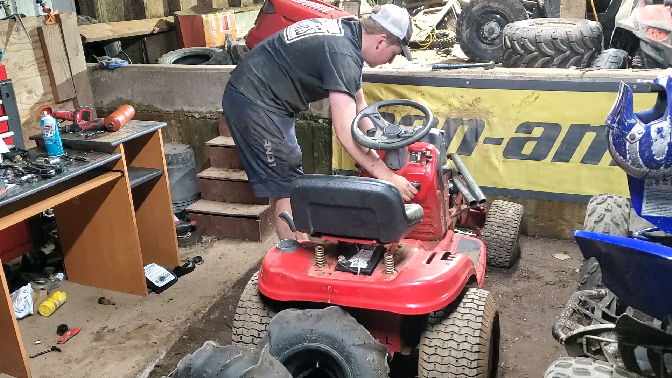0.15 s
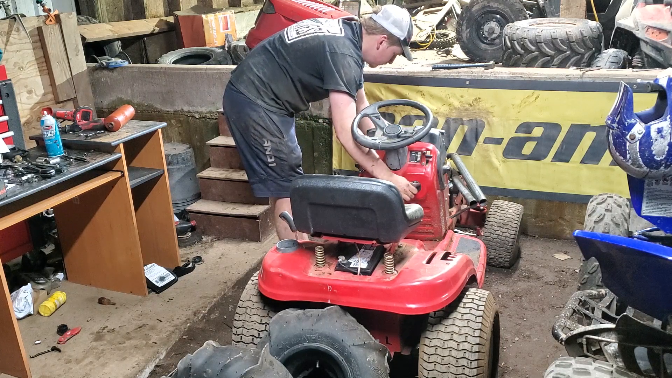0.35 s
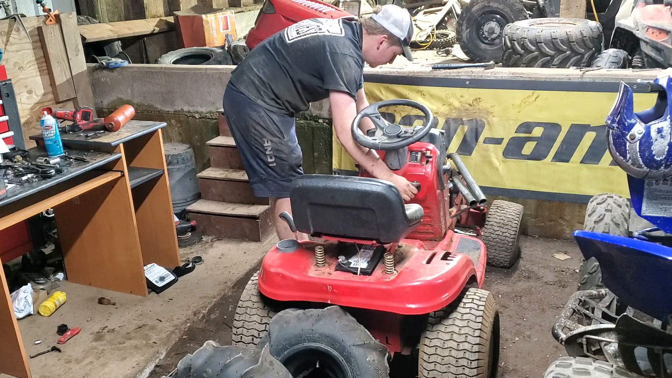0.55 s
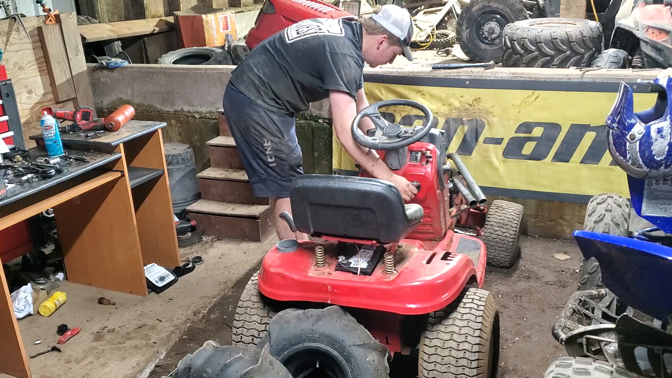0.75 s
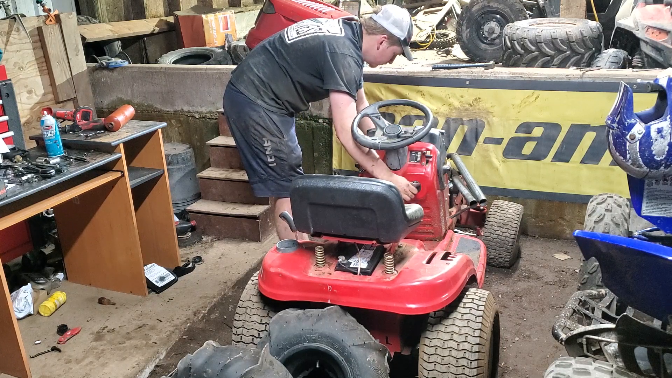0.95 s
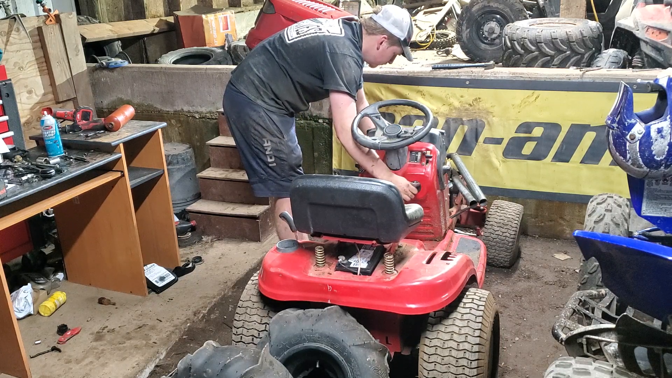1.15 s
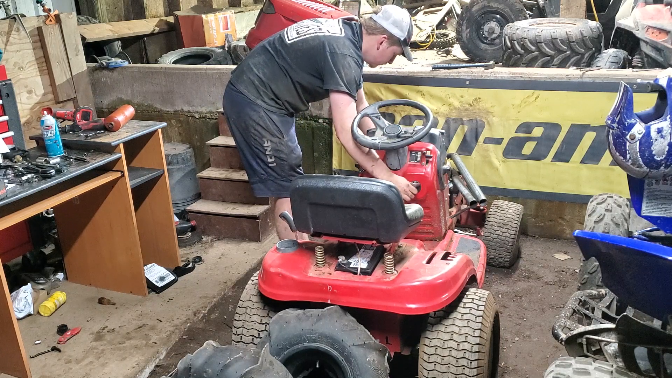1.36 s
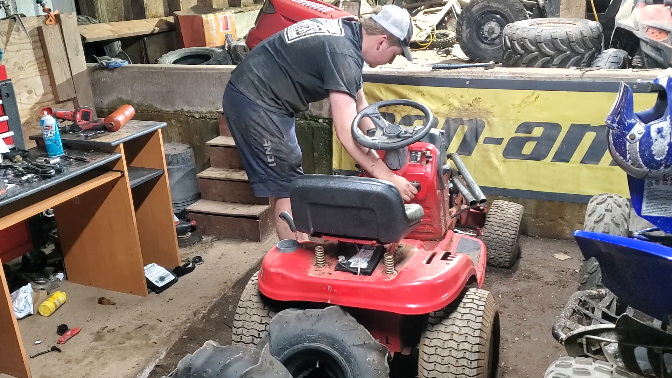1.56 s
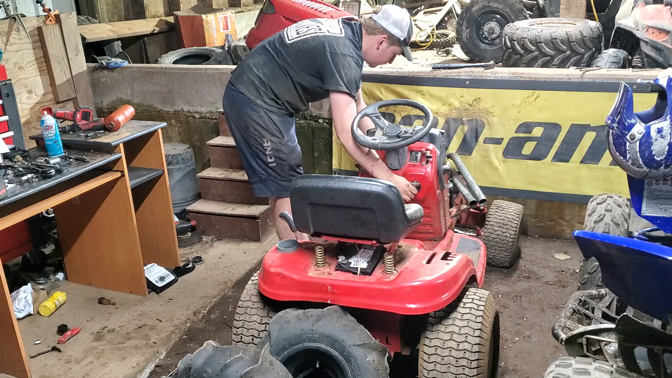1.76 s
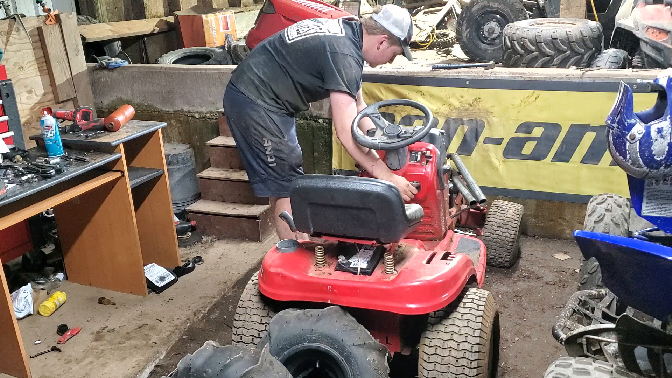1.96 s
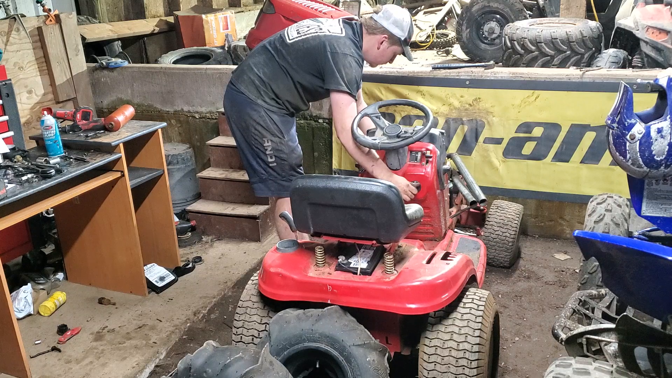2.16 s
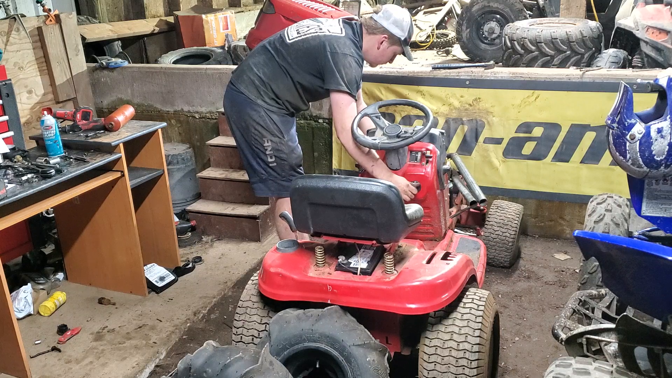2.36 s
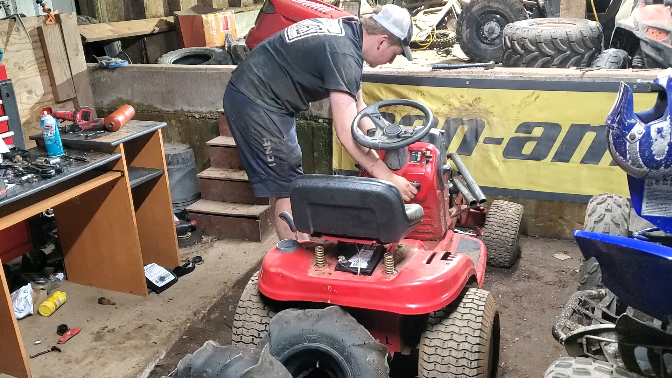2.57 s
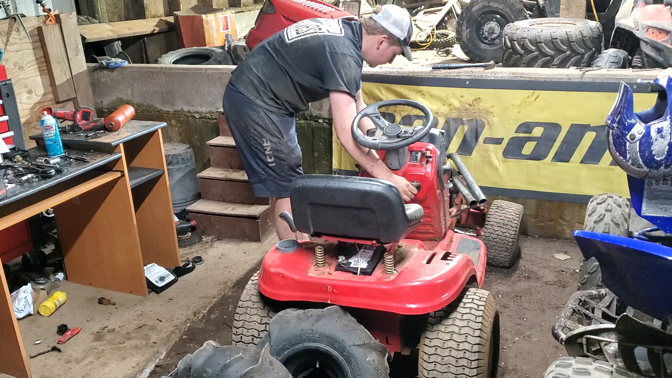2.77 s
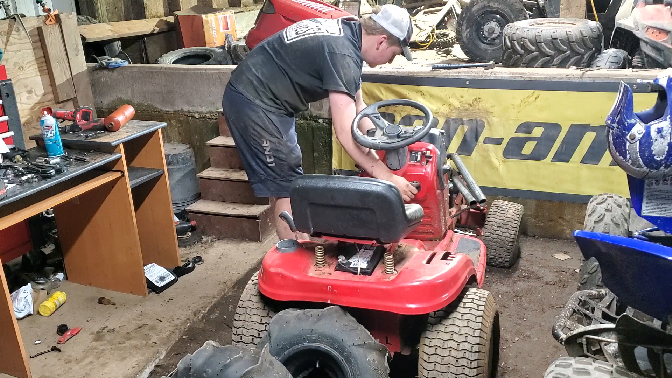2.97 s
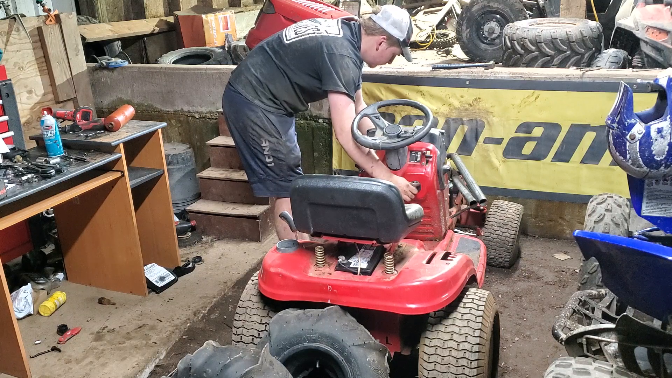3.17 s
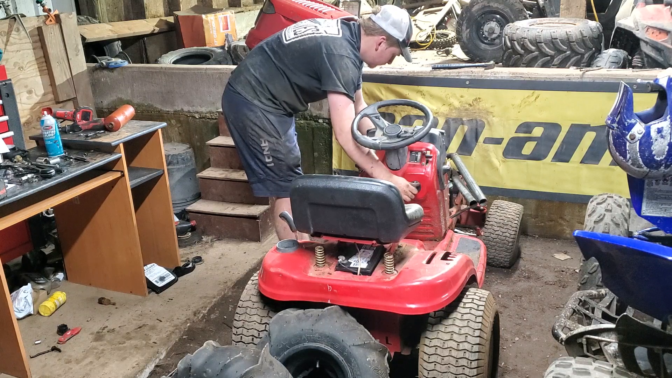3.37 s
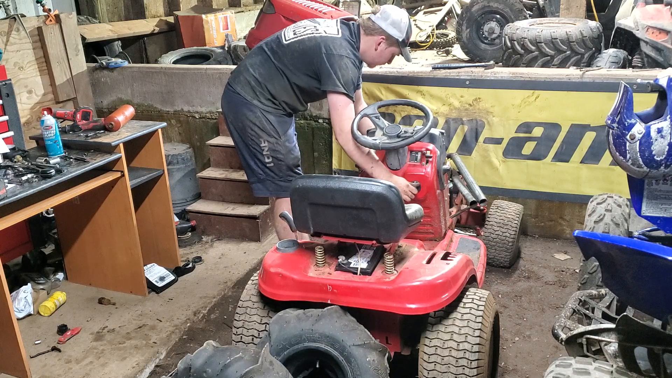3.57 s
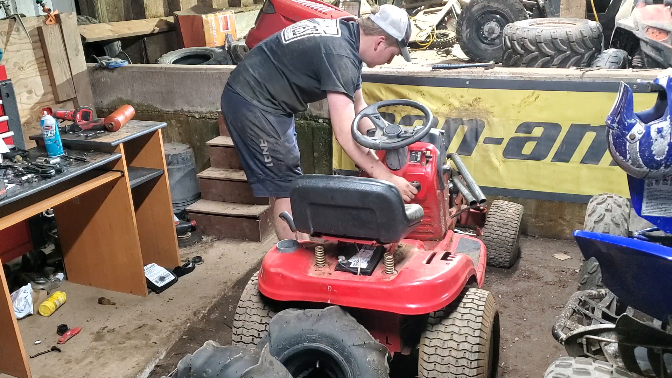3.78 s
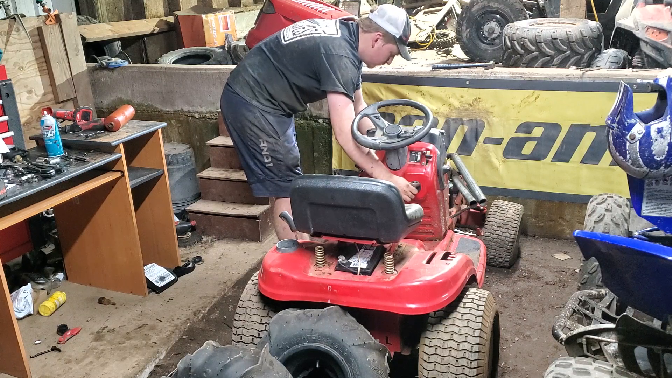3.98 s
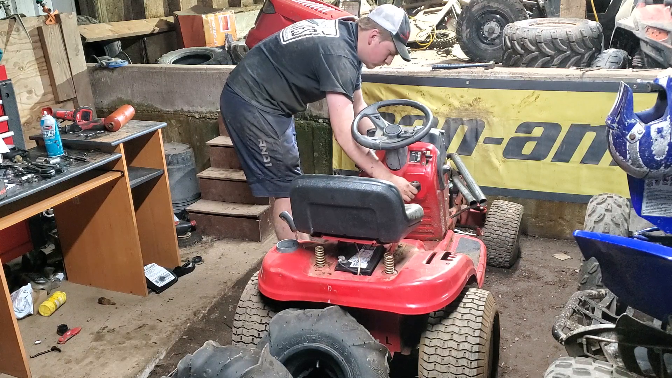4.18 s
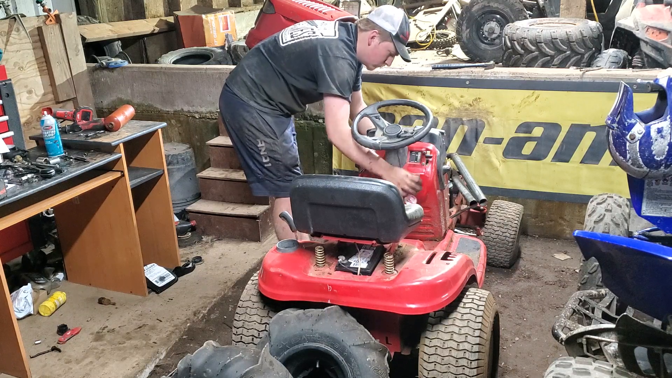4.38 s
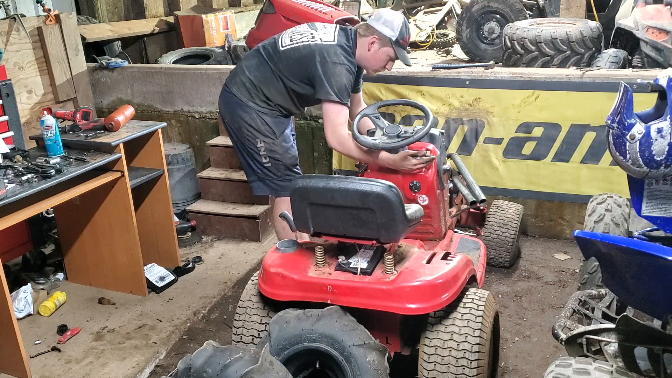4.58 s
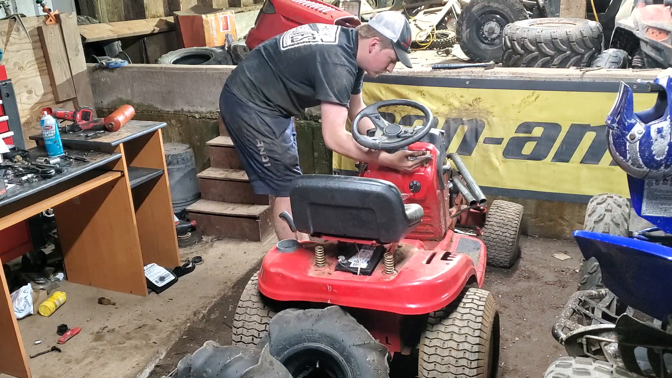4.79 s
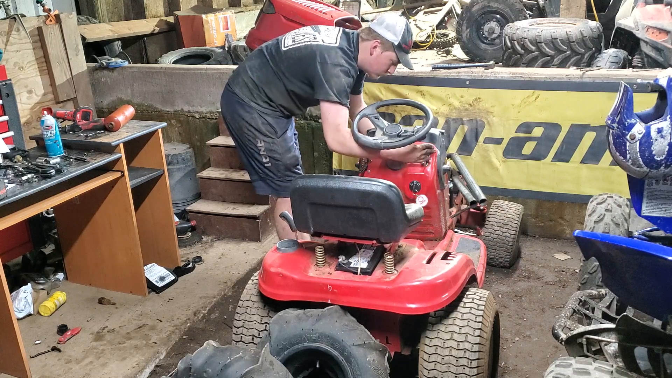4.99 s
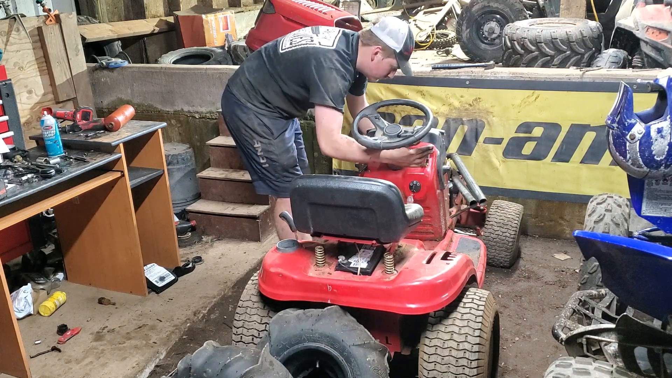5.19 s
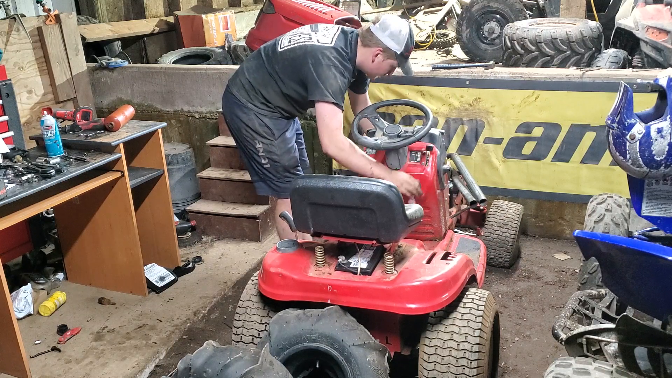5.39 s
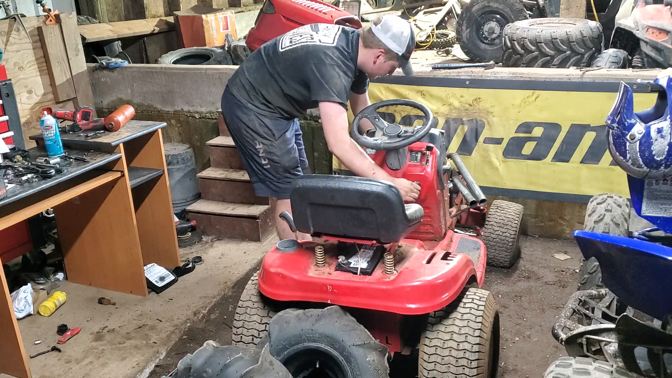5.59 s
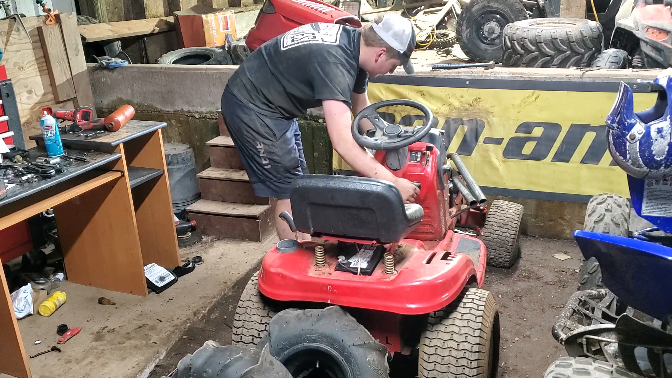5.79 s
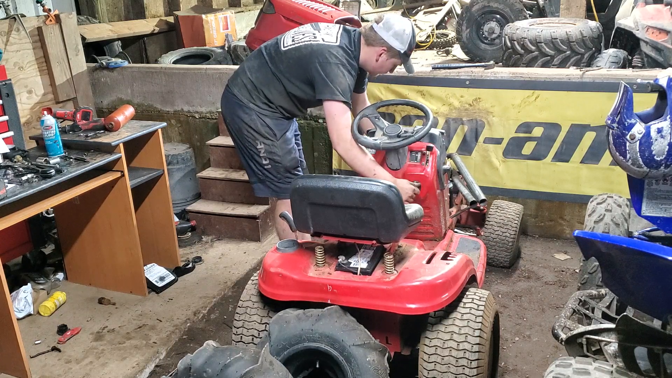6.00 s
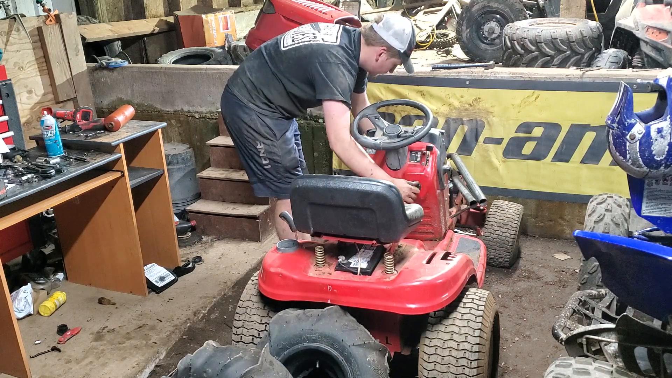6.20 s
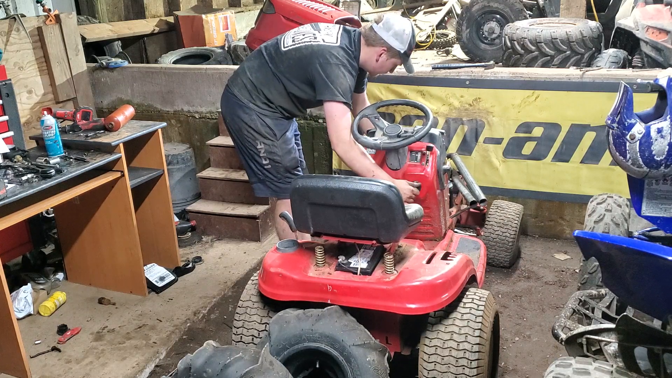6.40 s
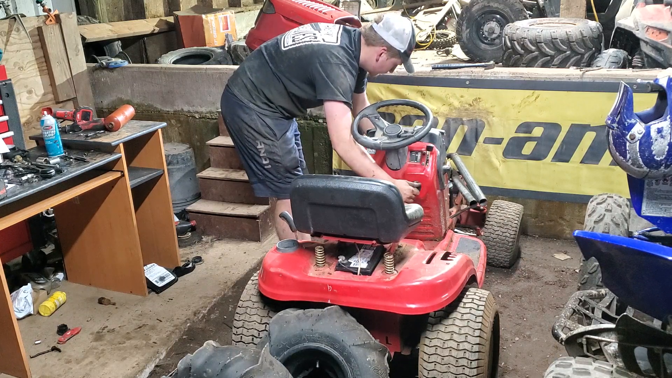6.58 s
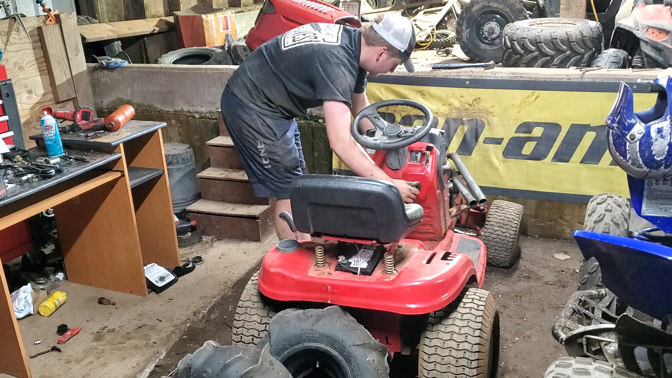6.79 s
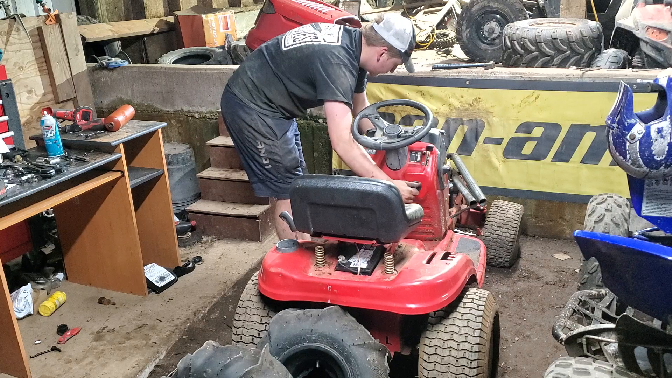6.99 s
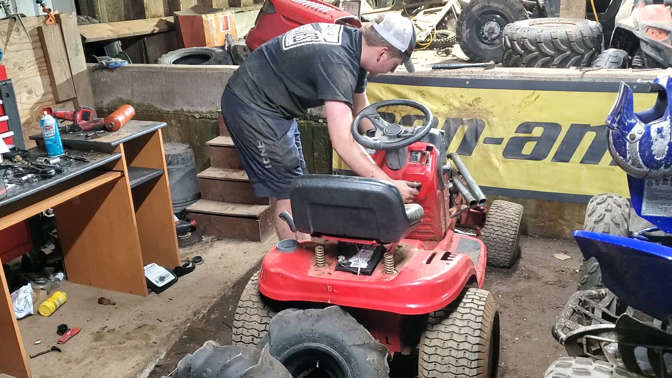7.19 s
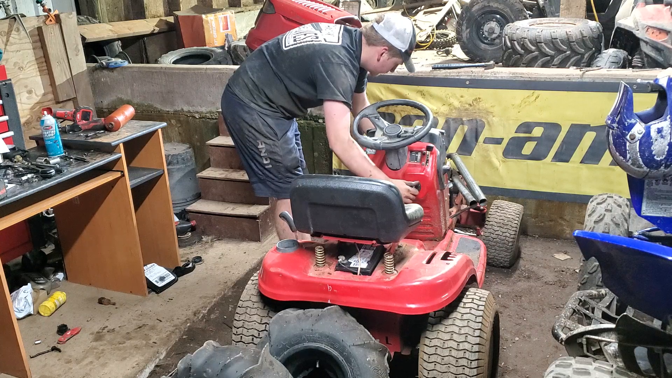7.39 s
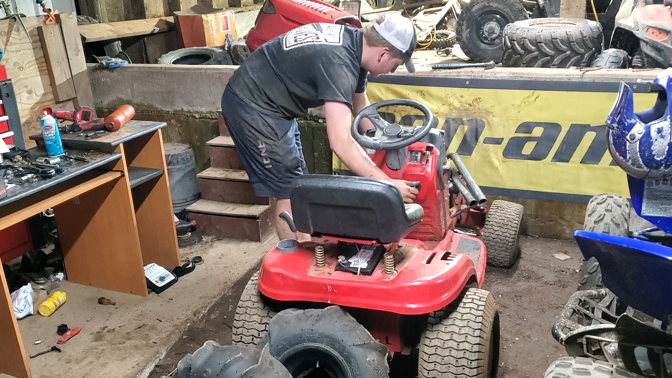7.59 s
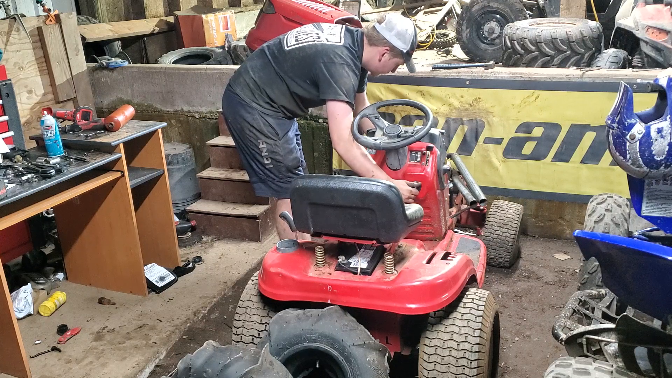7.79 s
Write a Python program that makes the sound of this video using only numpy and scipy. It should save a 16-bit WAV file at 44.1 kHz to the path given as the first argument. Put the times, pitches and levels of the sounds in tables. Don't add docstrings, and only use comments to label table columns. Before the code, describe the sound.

In an earth-floored workshop shed, a riding mower's starter whines and grinds without pause while the engine thumps about five or six times a second. Early on, a strong bang and two weaker ones burst from the open pipes, but it never runs. Hollow intake pops join later. At about 4.4 seconds the key is released, the engine wheezes down with a dull kick, then boots crunch over grit. Stereo microphone a few metres away, faint room hush.

```python
import sys
import numpy as np
from scipy import signal
from scipy.fft import rfft, irfft, next_fast_len
from scipy.io import wavfile
from scipy.ndimage import uniform_filter1d

SR = 44100
rng = np.random.default_rng(int(sys.argv[2]) if len(sys.argv) > 2 else 0)


def magnitude_from_level(level_db):
    exponent = np.asarray(level_db, float) / 20
    return 10 ** exponent


def log_audio(samples):
    frames = np.atleast_2d(samples).T
    limited = np.clip(frames, -1, 1)
    pcm = np.round(limited * 32767).astype(np.int16)
    wavfile.write(sys.argv[1], SR, pcm)


N = 346175
TIME, SIZE = np.arange(N) / SR, next_fast_len(N + SR // 10)
BINS_HZ = np.maximum(np.arange(SIZE // 2 + 1) * SR / SIZE, 1)

# start_s, cycles_turned
CRANK_TURNS = [(.004, 0), (.359, 2), (.871, 5), (1.226, 7), (1.407, 8), (2.33, 13), (2.898, 16), (3.09, 17),
               (3.465, 19), (4.377, 24), (4.588, 25)]
REAR_PHASE = 0.56

THUMP_DB, CRACK_DB, REAR_DB, BEAT_SCATTER_DB = -21, -22.5, -34.5, 1.22
FIRING_CYCLES = [3, 4, 5, 25]
# thump_db, crack_db, rear_db
FIRING_GAINS = [
    (9, 13.5, 10.5),
    (6.5, 11.5, 7.5),
    (0, 8.5, 5.5),
    (-3, -4.5, -5),
]
# pitch_hz, level_db, dying_time_s
PIPE_TONES = [(60.6, -.6, .17), (103.8, 7.4, .23), (75.8, -15.6, .8)]
SLUG_HZ, SLUG_T60_S = 91.7, .2
# pitch_hz, level_db_per_hz
CRACK_COLOUR = [(76, -22.5), (130, -10.5), (248, -28.5), (954, -13), (1970, -17), (2180, -19),
                (3460, -14.5), (4980, -30), (5850, -28.5), (7600, -25), (11800, -23.5), (16000, -29.5)]
# pitch_hz, width_hz, level_db
PIPE_MOUTH = [(535, 53, -6.5), (700, 280, -11.5), (3780, 170, -13), (5760, 450, -14.5), (6730, 790, -14.5)]

SPIT_CYCLES = [0, 10, 17, 18, 19, 20, 21, 22, 23, 24]
SPIT_LAG_S, SPIT_DB, SPIT_REAR_DB = .137, -26, 4.5
SPIT_REAR_LAG_S, SPIT_ECHO_DB = .022, -31

# start_s, level_db
EFFORT = [(0, 2.9), (.5, 2.1), (.72, -1.3), (1.0, 0.1), (1.3, 0.7), (1.6, 1.5), (2.0, -0.4), (2.35, 2),
          (2.6, 1.2), (2.95, -0.5), (3.2, 0), (3.4, 0.2), (3.75, 0.8), (4.12, 1.6), (4.4, 0)]
# start_s, pitch_hz
PINION_RATE = [(0, 982), (.5, 985), (.85, 1010), (1.2, 982), (1.35, 942), (1.85, 942), (2.1, 968),
               (2.35, 940), (2.9, 922), (3.3, 940), (3.7, 972), (4.5, 980)]
TEETH_PER_ARMATURE_TURN = 20
# multiple_of_tooth_rate, level_db
MESH_TONES = [(1, 0), (2, -9), (3, -11)]
# pitch_hz, width_hz, level_db
NOSE_CONE = [(936, 40, 3), (988, 40, 3), (1790, 40, 4)]
# pitch_hz, width_hz, level_db
RING_GEAR = [(2600, 71, 13.5), (2736, 50, 9.5), (2810, 40, 5), (2960, 74, 3.5)]
SCREECH_DB, SCREECH_WIDTH_HZ = -7, 170
# pitch_hz, level_db_per_hz
GRIND_COLOUR = [(90, -42), (150, -22.5), (254, -15), (376, -16), (566, -16), (960, -5.5), (1480, -12.5),
                (1760, -7), (2360, -16.5), (2810, -11.5), (3300, -15.5), (6600, -27.5), (10000, -33),
                (16000, -44)]
# pitch_hz, width_hz, level_db
HOUSING = [(642, 23, -8), (848, 20, -7.5), (1269, 19, 1.5), (1612, 25, -2.5), (1680, 53, -3.5),
           (1772, 13, 3.5), (2837, 33, -16.5)]
WHINE_DB, GRIND_DB, CLATTER_DB = -29.5, -30.5, -41
GRIND_FOLLOWS, CLATTER_DB_PER_HZ, LOAD_DB_PER_S = .25, 0.14, 4
RELEASE_S, WHINE_FALL, GRIND_FALL, CLATTER_FALL = 4.434, 170, 112, 52

# start_s, wheeze_db, rumble_db, intake_pop_db
COAST = [
    (4.599, -42.5, -36, -62),
    (4.645, -50.5, -39.5, -70),
    (4.813, -45.5, -46, -70),
    (4.843, -62, -45, -46),
    (4.928, -50.5, -49, -53),
    (5.0, -49, -63, -67),
    (5.05, -56, -50, -70),
    (5.28, -96.5, -51.5, -91),
    (5.4, -97, -57, -90),
]
STROKE_RISE_S, WHEEZE_T60_S, RUMBLE_T60_S = 0.0155, 0.52, 0.46
# pitch_hz, level_db_per_hz
WHEEZE_COLOUR = [(120, -36.5), (200, -12), (268, -7.5), (506, -10), (618, -16), (812, -11.5), (923, -17.5),
                 (2800, -16.5), (7480, -33), (11000, -32), (15500, -40)]
# pitch_hz, width_hz, level_db
WHEEZE_RING = [(2820, 250, -17.5), (3570, 230, -15.5)]
KICK_S, KICK_DB, KICK_LENGTH_S = 5.076, -38, 0.13
# pitch_hz, level_db_per_hz
KICK_COLOUR = [(71, -31.5), (120, -12.5), (252, -16.5), (288, -5), (321, -12), (565, -16), (655, -19),
               (802, -25.5), (3000, -46), (3900, -73), (6600, -120)]

# start_s, heel_grit_db, sole_db, sole_lag_s, ground_db
STEPS = [
    (5.585, -51.5, -53.5, 0.02, -64.5),
    (5.749, -40.5, -41.5, 0.025, -38.5),
    (6.246, -43.5, -47, 0.031, -45.5),
    (6.456, -41, -49, 0.0073, -46.5),
    (6.746, -42, -61, 0.015, -47.5),
    (7.074, -43, -49, 0.012, -43),
    (7.357, -40, -51.5, .02, -42.5),
    (7.799, -41.5, -45.5, 0.019, -41.5),
]
# pitch_hz, level_db_per_hz
GRIT_COLOUR = [(290, -31.5), (500, -1), (1090, -7.5), (1260, -6), (1770, -6), (1900, -12), (3020, -13.5),
               (6060, -30), (7980, -34.5), (11600, -32), (16000, -34.5)]
# pitch_hz, level_db_per_hz
GROUND_COLOUR = [(35, -50), (60, -24), (123, -14), (171, -16), (232, -8), (343, -2.5), (418, -5), (763, -9),
                 (1000, -8), (1300, -30), (2200, -120)]
FINE_DB, FINE_DB_PER_S = 1, 111
THUD_DB, THUD_LAG_S, THUD_SPLIT_HZ = 0.8, .04, 220

# pitch_hz, dying_time_s
SHED_T60 = [(60, 0.94), (260, 0.39), (700, 0.48), (1800, 0.37), (4800, 0.26), (12000, 0.39)]
# pitch_hz, likeness (1 is identical)
LIKENESS = [(60, 0.99), (130, 0.98), (290, 0.92), (640, 0.62), (1410, 0.25), (3100, -0.03), (6820, -0.11),
            (15000, -0.0)]
# pitch_hz, level_db_per_hz
QUIET_COLOUR = [(30, -13.5), (100, -11.5), (300, -9), (900, -9), (1500, -14), (3000, -19.5), (7000, -31.5),
                (16000, -30.5)]
QUIET_DB = -79
# pitch_hz, level_db
MAINS_HUM = [(60, -85), (120, -82), (180, -84)]
# pitch_hz, level_db
CAPSULE = [(6600, 0), (7100, -5), (8000, -8), (8800, -3), (10000, 0), (15850, 0), (16000, -60)]
# pitch_hz, level_db
PORTS = [(60, 1.5), (99, 1), (160, -2), (270, 0.0), (450, -1.5), (740, -2.5), (1220, 0), (2010, 2.0),
         (3330, 2), (5500, 1), (9080, -10), (15000, -11)]
LEFT_LAG = 5


def exhaust():
    s = beats()
    thump_db, crack_db, rear_db = strengths()
    rear_s = s + REAR_PHASE * np.append(np.diff(s), .2) + 0.003 * rng.standard_normal(len(s))
    valve = clicks(s + .0057, magnitude_from_level(thump_db)) + clicks(rear_s + .0057, magnitude_from_level(rear_db))
    blow_back_s = s[SPIT_CYCLES] + REAR_PHASE * .185 + SPIT_REAR_LAG_S
    valve = valve + clicks(blow_back_s, magnitude_from_level(SPIT_ECHO_DB))
    push = signal.windows.gaussian(801, 100)
    slug = signal.fftconvolve(valve, push / push.sum(), "same")
    column = magnitude_from_level(-63) * ring(ring(slug, SLUG_HZ, SLUG_T60_S), SLUG_HZ, SLUG_T60_S)
    boom = 0
    for k, (hz, db, t60) in enumerate(PIPE_TONES):
        boom = boom + (-1) ** (k + 1) * magnitude_from_level(db) * ring(slug, hz, t60)
    opened = uniform_filter1d(clicks(s + .0075, magnitude_from_level(thump_db + crack_db)), size=SR // 500)
    bang = noise(CRACK_COLOUR, PIPE_MOUTH) * magnitude_from_level(10.5) * fade(opened, 0.049)
    dull = signal.sosfilt(signal.butter(1, 4000, fs=SR, output="sos"), noise(CRACK_COLOUR))
    return column + boom + bang + dull * magnitude_from_level(7.5) * fade(opened, 0.32)


def beats():
    s, cycles = np.transpose(CRANK_TURNS)
    return np.interp(np.arange(cycles[-1] + 1), cycles, s)


def strengths():
    gain = BEAT_SCATTER_DB * rng.standard_normal((len(beats()), 3)) * [.6, 1.8, 2.5]
    gain[SPIT_CYCLES] = gain[SPIT_CYCLES] * .5 + np.array([0, 0, 1]) * SPIT_REAR_DB
    gain[FIRING_CYCLES] = FIRING_GAINS
    return (gain + [THUMP_DB, CRACK_DB, REAR_DB]).T


def starter(tail):
    effort_db = np.interp(TIME, *np.transpose(EFFORT))
    tooth_hz = np.interp(TIME, *np.transpose(PINION_RATE))
    off = np.maximum(TIME - RELEASE_S, 0)
    held = TIME - off
    whine_db = WHINE_DB + effort_db - WHINE_FALL * off
    grind_db = GRIND_DB + GRIND_FOLLOWS * effort_db + 0.34 * held - GRIND_FALL * off
    clatter_db = CLATTER_DB + CLATTER_DB_PER_HZ * (960 - tooth_hz)
    clatter_db = clatter_db + LOAD_DB_PER_S * (held - 2) - CLATTER_FALL * off

    cycle = 2 * np.pi * crank()
    teeth = 2 * np.pi * np.cumsum(tooth_hz) / SR
    teeth = teeth + 1.4 * np.sin(2 * cycle - 1.3)
    teeth = teeth + np.cumsum(drift(30.0) * magnitude_from_level(-2.0)) * 2 * np.pi * 8.19 / SR

    throb = 1 + .55 * np.cos(teeth / TEETH_PER_ARMATURE_TURN + .6 * drift(8.0))
    mesh = sum(magnitude_from_level(db + 3.0 * drift(19.0)) * np.sin(k * teeth) for k, db in MESH_TONES)
    flat_base = [(10, 0), (20000, 0.0031)]
    swelling = throb * mesh * magnitude_from_level(3.4 * np.cos(2 * cycle - 1.8))
    whine = coloured(swelling, response(flat_base, NOSE_CONE))
    scuff = drift(SCREECH_WIDTH_HZ) * np.cos(3 * teeth)
    screech = coloured(scuff, response(flat_base, RING_GEAR))
    whine = rms_one(whine) + magnitude_from_level(SCREECH_DB) * rms_one(screech)
    whine = rms_one(shed(whine, tail, direct_db=10.0, build_s=0.0067)[:, :N])

    grind = noise(GRIND_COLOUR, HOUSING) * magnitude_from_level(0.77 * np.cos(2 * cycle - 2.2) + 0.7 * drift(29.0))
    rattle = noise([(300, -20.0), (500, -12.5), (760, 2.5), (900, 0.5), (1200, -30.5)])
    clatter = rattle * magnitude_from_level(4.5 * np.cos(cycle - 5.3) + 2.5 * drift(51.0))
    return magnitude_from_level(whine_db) * whine + magnitude_from_level(grind_db + 3.0) * grind + magnitude_from_level(clatter_db - 5.5) * clatter


def crank():
    s = beats()[:-1]
    period = s[-1] - s[-2]
    s = np.r_[s[0] - period, s, s[-1] + period * np.arange(1, 30)]
    cycles = np.interp(TIME, s, np.arange(len(s)))
    return np.cumsum(uniform_filter1d(np.gradient(cycles), size=SR // 8)) + cycles[0]


def intake():
    s, _, _, coast_db = np.transpose(COAST)
    spit_s = beats()[SPIT_CYCLES]
    spit_db = SPIT_DB - 12 * np.maximum(spit_s - 4.2, 0)
    pops = clicks(spit_s + SPIT_LAG_S - .008, magnitude_from_level(spit_db)) + clicks(s - .008, magnitude_from_level(coast_db))
    return magnitude_from_level(-38) * ring(ring(pops, 262, 0.056), 262, 0.056)


def coasting(tail):
    _, wheeze_db, rumble_db, _ = np.transpose(COAST)
    rumble = noise([(30, -22.5), (60, 2.5), (105, 11.0), (150, -4.5), (200, -0.5), (300, -36)])
    rumble = stroke(rumble_db - 7.5, RUMBLE_T60_S) * rumble
    wheeze = stroke(wheeze_db, WHEEZE_T60_S) * noise(WHEEZE_COLOUR, WHEEZE_RING)
    knock = rms_one(coloured(rng.standard_normal(N), response(KICK_COLOUR)))
    knock = magnitude_from_level(KICK_DB) * swell(TIME - KICK_S, KICK_LENGTH_S) * knock
    kick = shed(knock, tail, direct_db=-2.5, build_s=0.0075)
    return wheeze + rumble + kick[:, :N]


def stroke(db, t60):
    level = fade(clicks(np.array(COAST)[:, 0], np.power(magnitude_from_level(db), 2)), t60 / 2)
    return np.sqrt(np.abs(uniform_filter1d(level, size=max(round(STROKE_RISE_S * SR), 1))))


def boots(tails):
    grain_db = 0.87 * np.minimum(rng.exponential(1, N), 4) + 2.0 * drift(170.0)
    grains = rng.standard_normal(N) * magnitude_from_level(grain_db)
    grit = rms_one(coloured(grains, response(GRIT_COLOUR)))
    fine = signal.sosfilt(signal.butter(4, 4300, "high", fs=SR, output="sos"), grit)
    coarse = signal.sosfilt(signal.butter(4, 4300, fs=SR, output="sos"), grit)
    soil = rms_one(coloured(rng.standard_normal(N), response(GROUND_COLOUR)))
    ground = signal.sosfilt(signal.butter(3, THUD_SPLIT_HZ, "high", fs=SR, output="sos"), soil)
    thud = signal.sosfilt(signal.butter(3, THUD_SPLIT_HZ, "low", fs=SR, output="sos"), soil)
    light_touch = signal.butter(2, [700, 8500], "band", fs=SR, output="sos")
    out, since = np.zeros((2, N + SR)), TIME[:SR // 5]
    for (s, heel_db, sole_db, lag, ground_db), tail in zip(STEPS, tails):
        start = round(s * SR)
        part = slice(start - SR, start - SR + len(since))
        stones = coarse[part] + magnitude_from_level(FINE_DB + FINE_DB_PER_S * lag) * fine[part]
        nip = np.exp(-since / 0.038) * np.minimum(since / 0.0022, 1)
        heel = magnitude_from_level(heel_db) * nip * signal.sosfilt(light_touch, stones)
        sole = magnitude_from_level(sole_db) * swell(since - lag, .06 + 1.3 * lag) * stones
        weight = swell(since - 0.72 * lag, .14)
        late = magnitude_from_level(THUD_DB) * swell(since - THUD_LAG_S, 0.14) ** 1.3
        answer = magnitude_from_level(ground_db) * (weight * ground[part] + late * thud[part])
        heard = shed(heel + sole + answer, tail, direct_db=-1.0, build_s=0.00057)
        out[:, start:start + heard.shape[1]] += magnitude_from_level(3.0) * heard
    return out[:, :N]


def swell(since, length):
    return np.sin(np.pi * np.clip(since / length, 0, 1) ** 0.32) ** 2


def shed(x, tail, direct_db, build_s):
    path = tail * (1 - np.exp(-TIME[:tail.shape[1]] / build_s))
    path[:, 0] += magnitude_from_level(direct_db)
    return signal.fftconvolve(x[None], path, axes=1)


def echoes(count):
    span = N // 10
    t, tails = TIME[:span], 0
    white = noise([(10, 0), (20000, 0)])[:, :count * span].reshape(2, count, span)
    for low in 40 * 2 ** np.arange(0, 9, .5):
        band = signal.sosfilt(signal.butter(1, [low, low * 2 ** .5], "band", fs=SR, output="sos"), white)
        t60 = at_hz(SHED_T60, low * 1.2)
        tails = tails + band * magnitude_from_level(-60 * t / t60) / np.sqrt(t60)
    return np.swapaxes(tails, 0, 1) / np.sqrt(np.sum(tails ** 2) / (2 * count))


def quiet_shed():
    hum = sum(magnitude_from_level(db + 3) * np.sin(2 * np.pi * hz * TIME) for hz, db in MAINS_HUM)
    return magnitude_from_level(QUIET_DB) * noise(QUIET_COLOUR) + hum


def noise(spectrum, peaks=()):
    alike = np.clip(at_hz(LIKENESS, BINS_HZ), -1, 1)
    gain = response(spectrum, peaks) * np.sqrt([1 + alike, 1 - alike])
    mid, side = coloured(rng.standard_normal((2, SIZE)), gain)
    return rms_one(np.array([mid + side, mid - side]))


def drift(hz):
    return rms_one(coloured(rng.standard_normal(SIZE), 1 / (1 + (BINS_HZ / hz) ** 2)))


def response(spectrum, peaks=()):
    power = magnitude_from_level(at_hz(spectrum, BINS_HZ)) ** 2
    for hz, width, db in peaks:
        power = power + magnitude_from_level(db) ** 2 / (1 + (2 * (BINS_HZ - hz) / width) ** 2) ** 2
    return np.sqrt(power)


def coloured(x, gain):
    return irfft(rfft(x, SIZE) * gain, SIZE)[..., :N]


def at_hz(points, hz):
    table_hz, values = np.array(points).T
    return np.interp(np.log(hz), np.log(table_hz), values)


def clicks(times, sizes):
    out = np.full(N, 1e-18)
    places = np.round(np.asarray(times) * SR).astype(int)
    np.add.at(out, np.clip(places, 0, N - 1), sizes)
    return out


def ring(x, hz, t60):
    r, w = magnitude_from_level(-60 / (t60 * SR)), 2 * np.pi * hz / SR
    return signal.lfilter([0, np.sin(w)], [1, -2 * r * np.cos(w), r * r], x)


def fade(x, t60):
    return signal.lfilter([1], [1, -magnitude_from_level(-60 / (t60 * SR))], x)


def rms_one(x):
    return x / np.sqrt(np.mean(x ** 2) + 1e-20)


def scene():
    tails = echoes(count=10)
    engine = exhaust() + intake() + starter(tails[0]) + coasting(tails[1])
    return engine + boots(tails[2:]) + quiet_shed()


def top_cut(x):
    return signal.sosfilt(signal.butter(12, 16470, fs=SR, output="sos"), x)


def record(dry):
    tilt = magnitude_from_level(at_hz(PORTS, BINS_HZ) / 2 * [[1], [-1]])
    ports = coloured(dry, response(CAPSULE) * tilt / np.mean(tilt, axis=0))
    ports[0] = np.r_[np.zeros(LEFT_LAG), ports[0, :-LEFT_LAG]]
    ports = signal.sosfilt(signal.butter(3, 40, "high", fs=SR, output="sos"), ports)
    return top_cut(ports)


dry = scene()
out = record(dry)
log_audio(out)
```